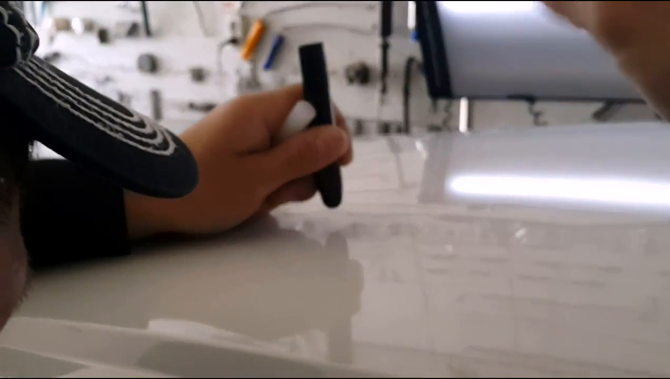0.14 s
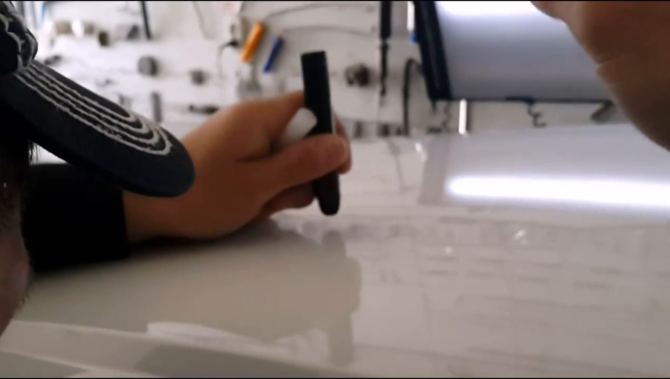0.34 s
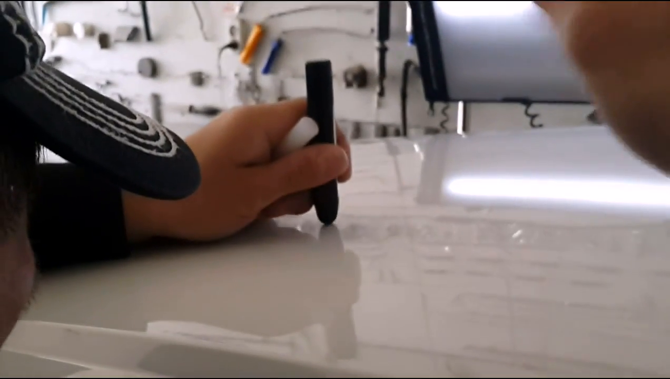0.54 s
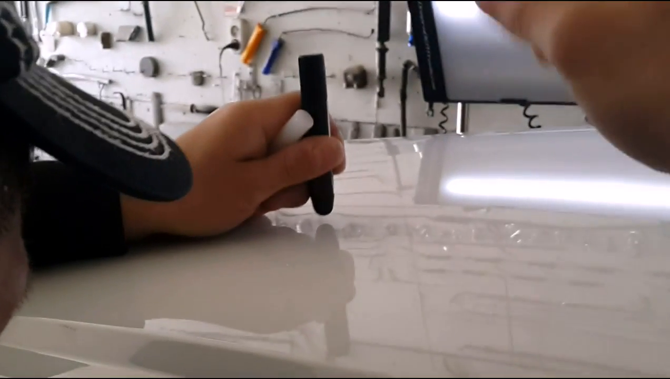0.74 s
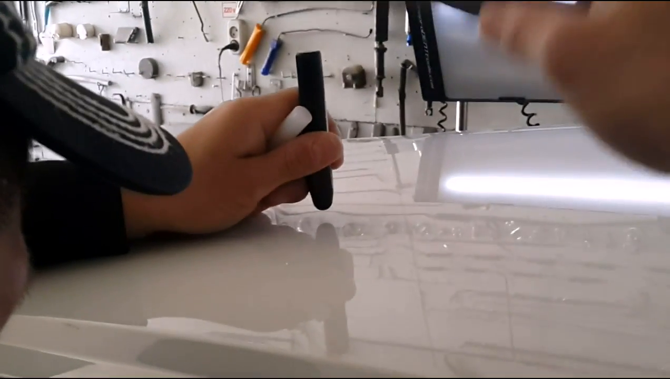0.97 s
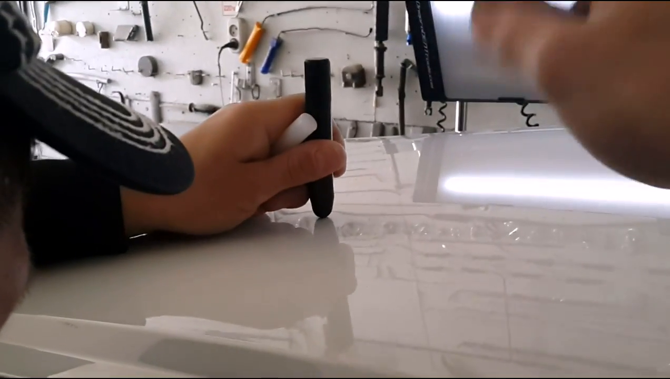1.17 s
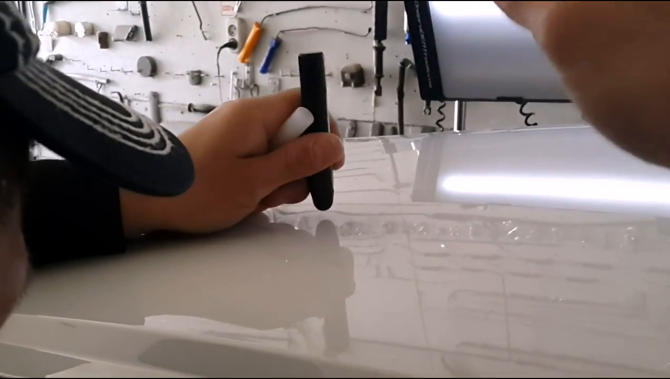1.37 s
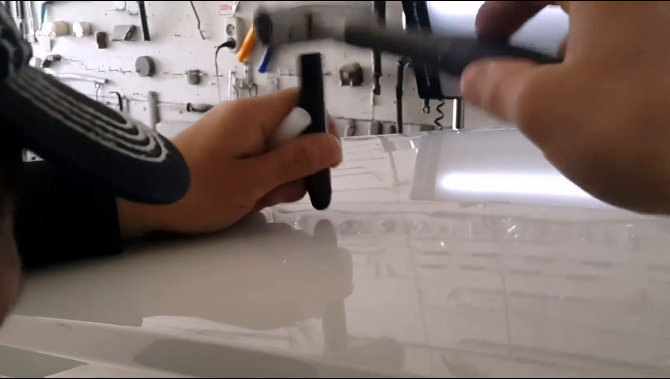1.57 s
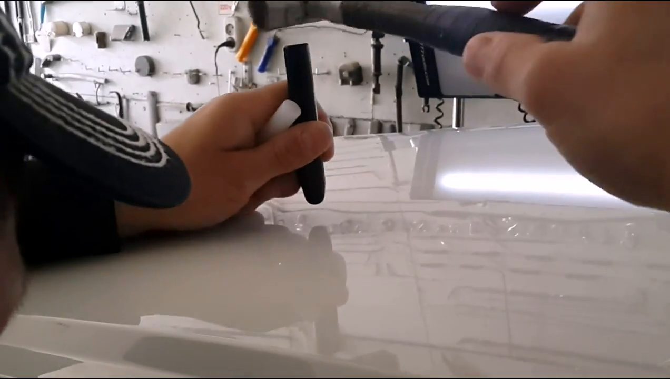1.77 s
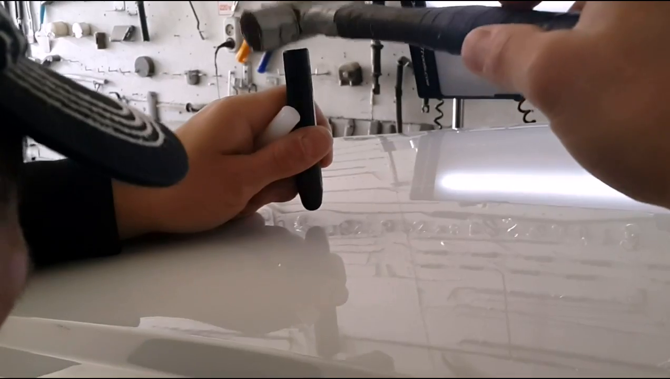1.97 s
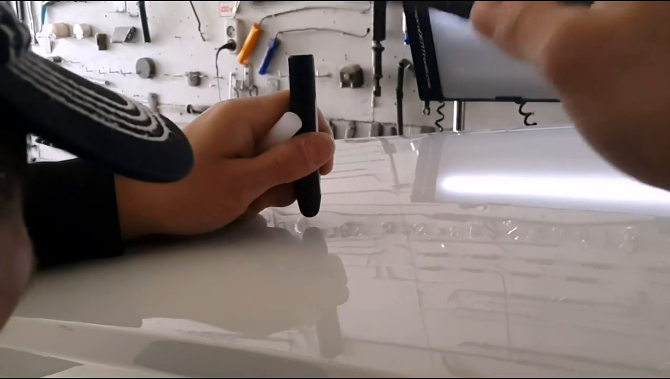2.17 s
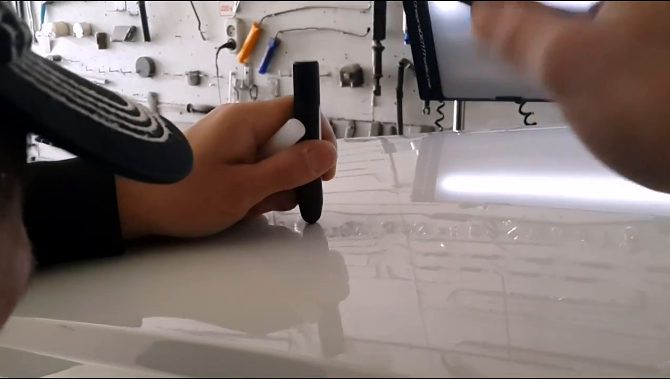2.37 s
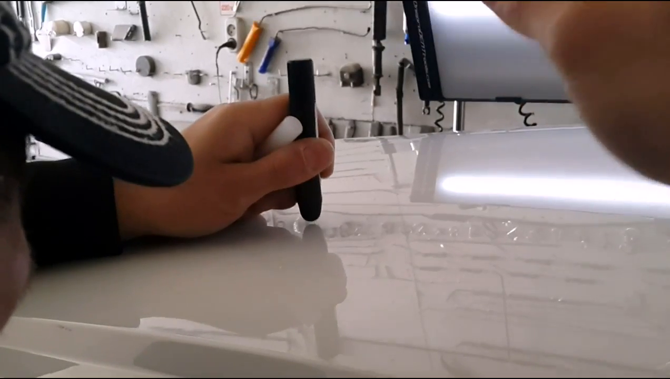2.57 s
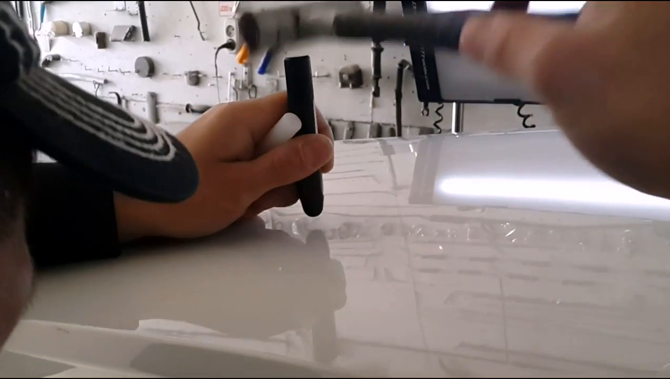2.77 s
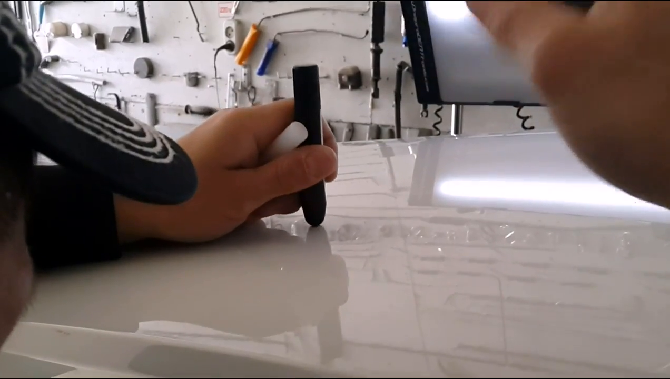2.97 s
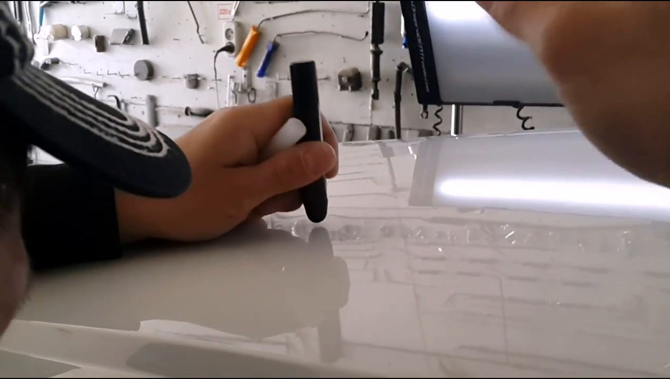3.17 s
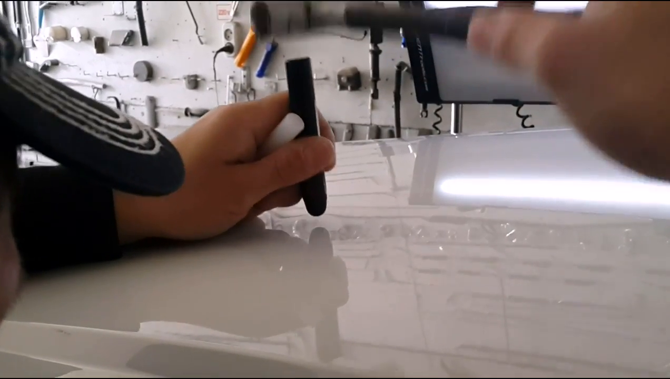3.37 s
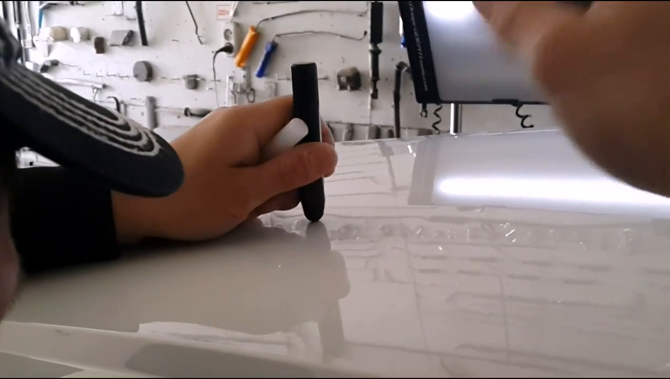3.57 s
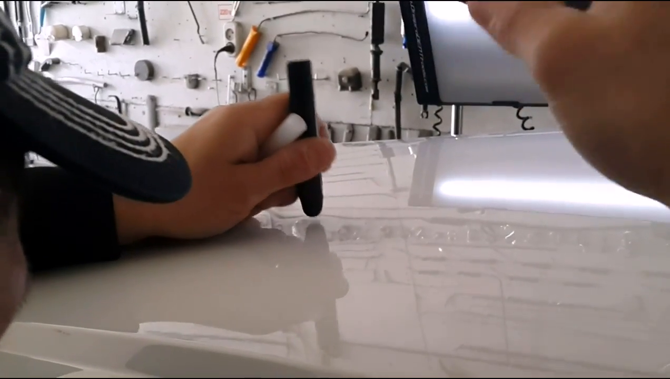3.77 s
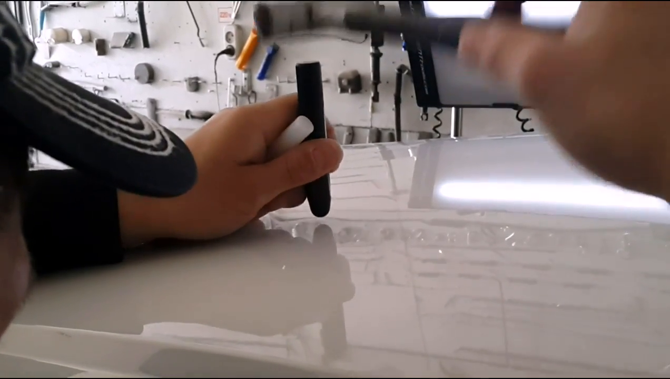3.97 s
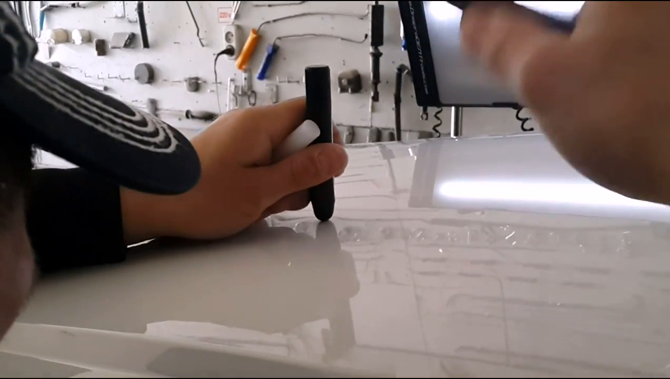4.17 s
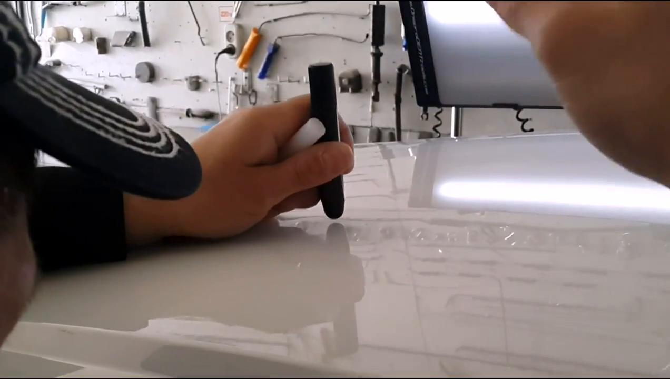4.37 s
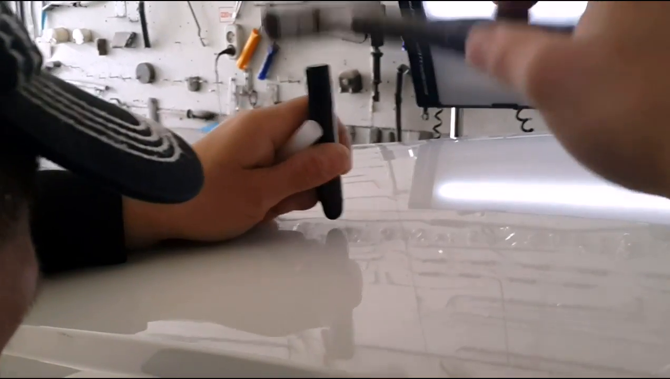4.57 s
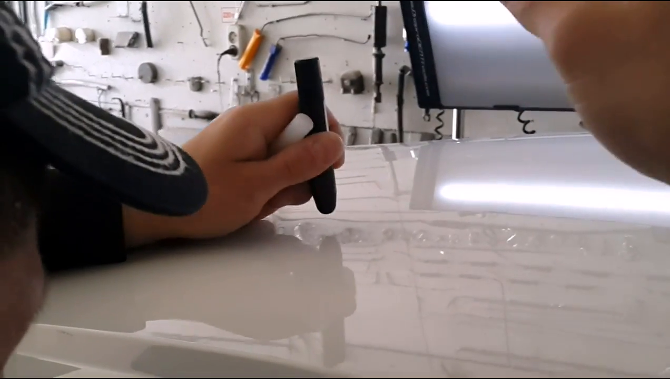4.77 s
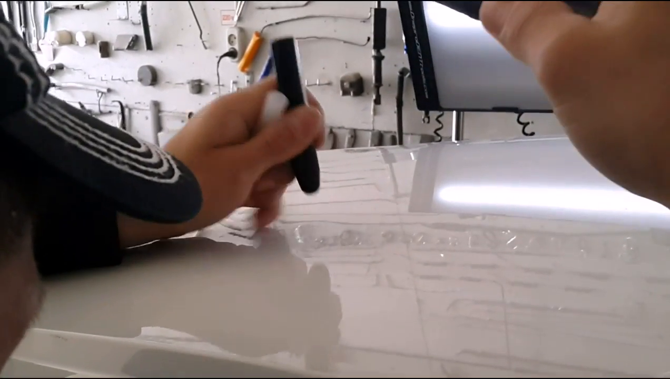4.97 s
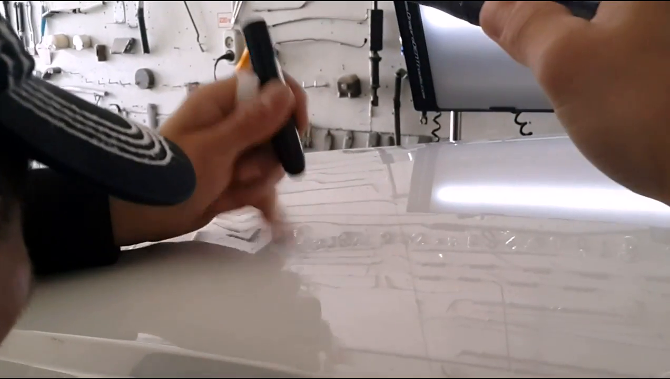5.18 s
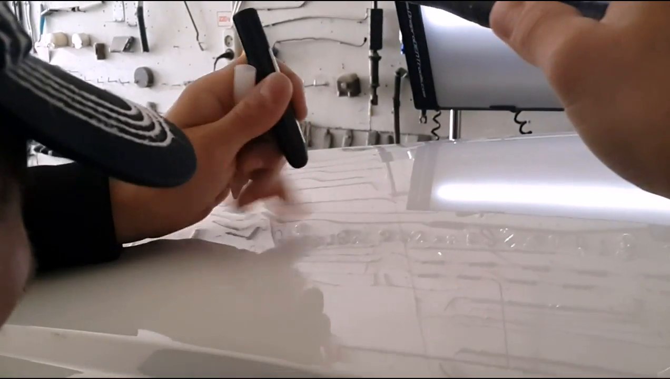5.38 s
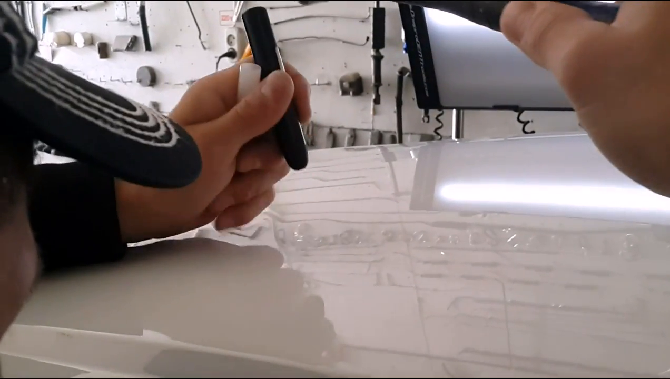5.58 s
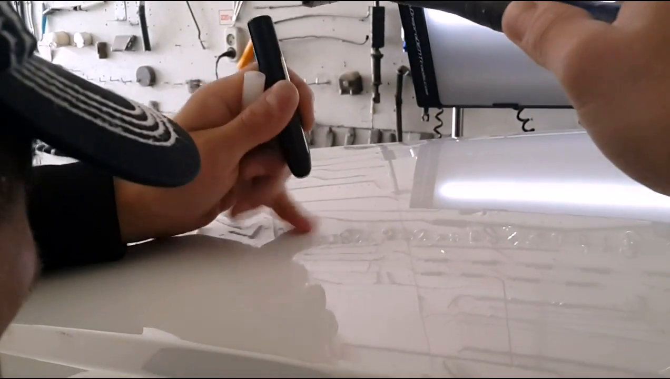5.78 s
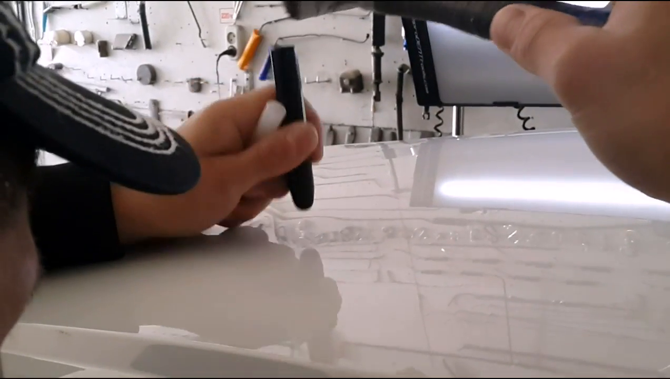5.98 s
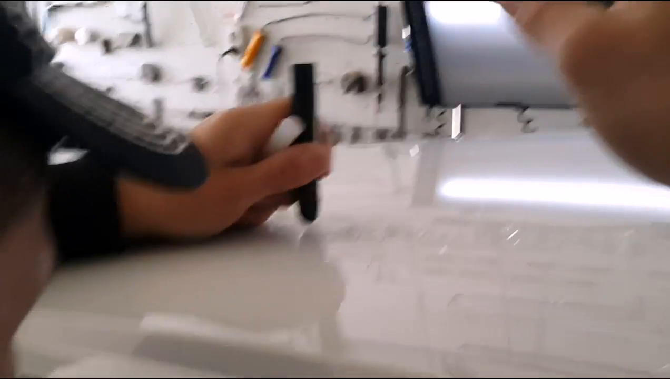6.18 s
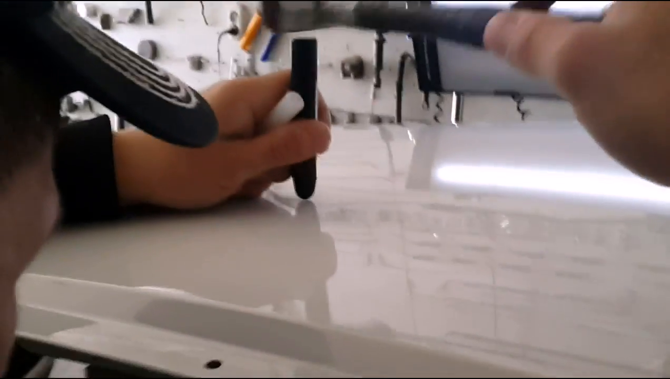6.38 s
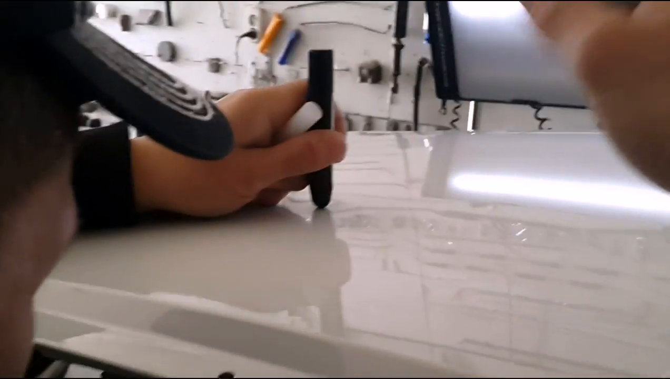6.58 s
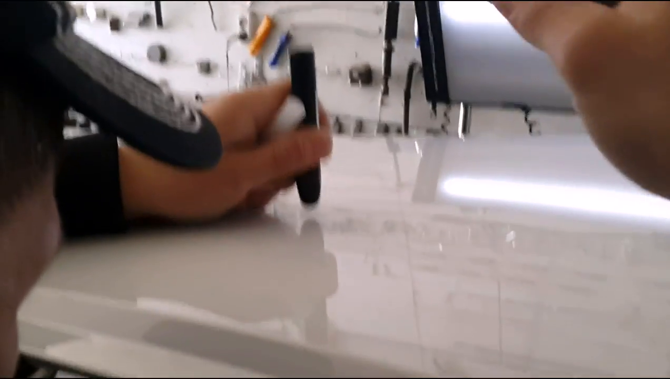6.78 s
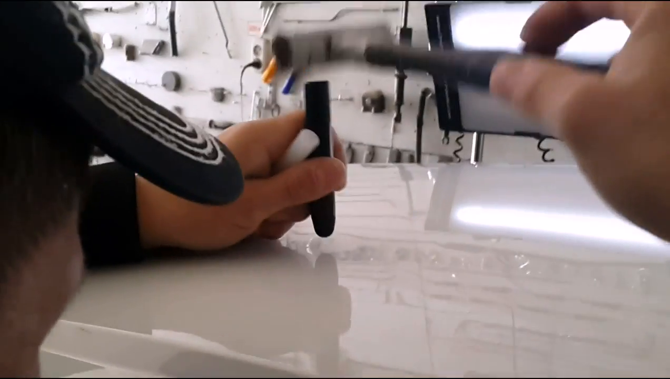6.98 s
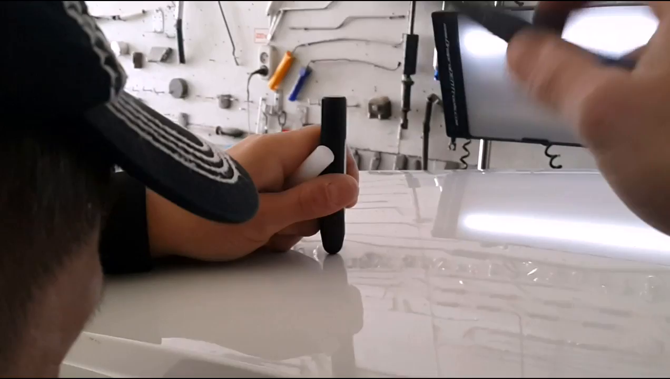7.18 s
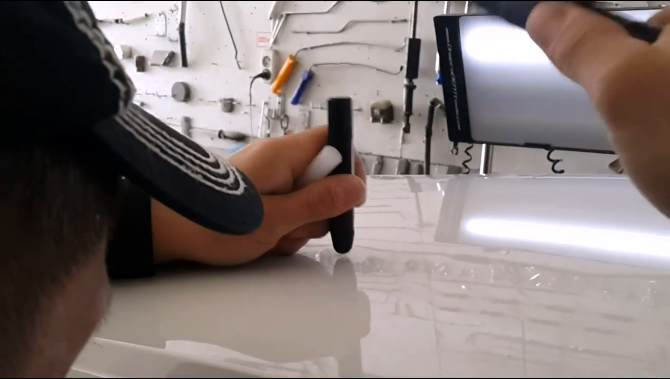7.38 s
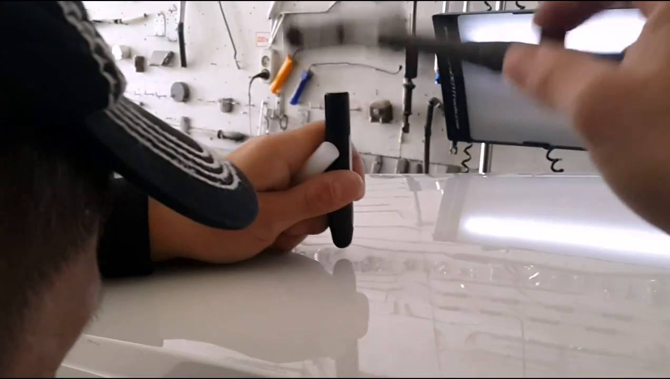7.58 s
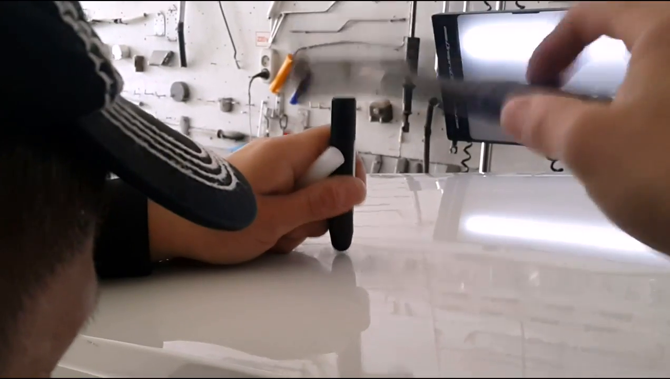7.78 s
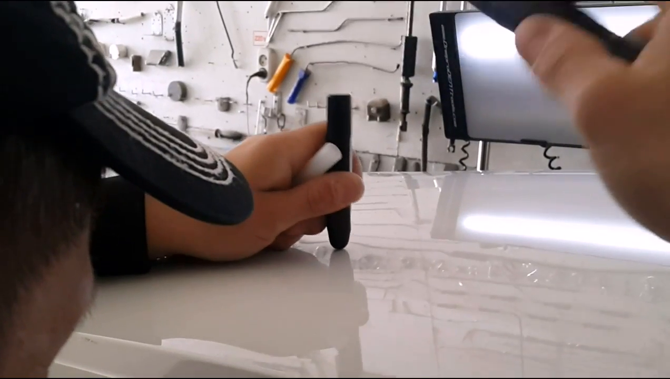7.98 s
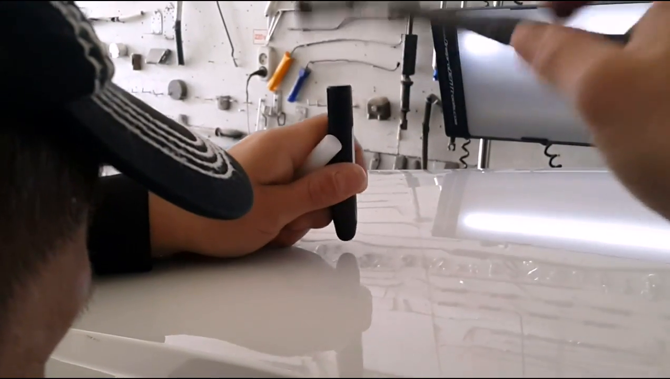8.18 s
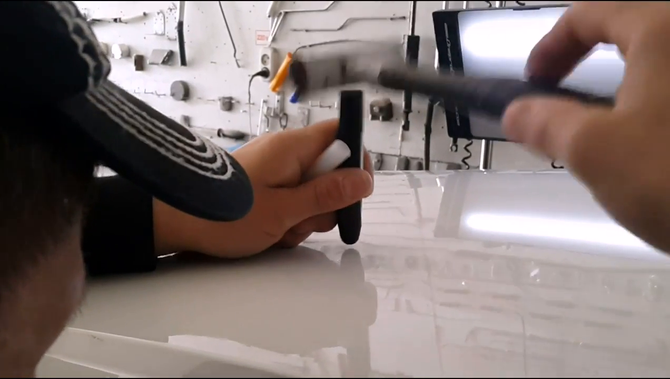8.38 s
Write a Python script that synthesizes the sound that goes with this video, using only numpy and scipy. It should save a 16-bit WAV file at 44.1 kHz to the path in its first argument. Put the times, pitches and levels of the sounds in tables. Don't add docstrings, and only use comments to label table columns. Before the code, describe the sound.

In a bare hard-walled workshop, rapid metal taps hit a body panel through a steel punch, loud and slightly squashed by a camera microphone. The panel rings dull and clanky for under half a second, overlapping into the next blow. Tiny ticks of the punch being reset precede many hits. Midway, tapping stops; soft fingertip knocks and swelling lamp and fan hum appear before the strongest hit restarts the run.

```python
import sys
import numpy as np
from scipy import signal
from scipy.fft import rfft, irfft
from scipy.io import wavfile
from scipy.ndimage import uniform_filter1d, map_coordinates

SR = 44100
rng = np.random.default_rng(int(sys.argv[2]) if len(sys.argv) > 2 else 0)


def boost(x):
    u = np.asarray(x, float) / 20
    return 10 ** u


def transcribe(u):
    v = np.clip(np.atleast_2d(u).T, -1, 1)
    q = np.round(v * 32767).astype(np.int16)
    wavfile.write(sys.argv[1], SR, q)


N = 372204

RING = 24576
TYPICAL_MIDDLE_DB, TYPICAL_TREBLE_DB = -10, -23


def unit(x):
    return x / np.sqrt(np.mean(x ** 2) + 1e-20)


def along(points, hz):
    f, v = np.transpose(points)
    return np.interp(np.log(hz + 1), np.log(f + 1), v)


# frequency in Hz, left over right in dB.
STEREO_LEAN = [(60, 1), (110, 0), (200, 2), (380, -0.5), (700, 0.5), (1290, -4.5), (2380, -3), (4400, 4),
               (8120, -4.5), (15000, 0)]


def spread(pair, spectrum, alike):
    hz = np.fft.rfftfreq(pair.shape[-1], 1 / SR)
    turn = np.arccos(np.clip(along(alike, hz), -1, 1)) / 2
    mid, side = rfft(pair) * boost(along(spectrum, hz)) * [np.cos(turn), np.sin(turn)]
    lean = boost(along(STEREO_LEAN, hz) / 2)
    return unit(irfft(np.array([(mid + side) * lean, (mid - side) / lean]), pair.shape[-1]))


def causal(x, gain):
    cepstrum = irfft(np.log(gain + 1e-6), x.shape[-1])
    cepstrum[1:len(cepstrum) // 2] *= 2
    cepstrum[len(cepstrum) // 2 + 1:] = 0
    return irfft(rfft(x) * np.exp(rfft(cepstrum)), x.shape[-1])


# start in seconds, body peak in dB,
# treble over body in dB, boom in dB, shine of the punch at 8 kHz in dB.
BLOWS = [(-.17, -17.5, -17, 1, 0), (0.096, -11, -16, -1, 0), (0.795, -9, -15.5, -0.5, 1.5),
         (1.066, -8, -16.5, -1.5, 1), (1.384, -6.5, -18.5, -1.5, 0.5), (1.721, -8, -15.5, -1, -1),
         (2.585, -9, -15.5, 1.5, 1.5), (2.858, -6.5, -28.5, 0.2, 6), (3.218, -7, -23.5, -0.5, 6),
         (3.481, -6.5, -24.5, -1.5, 3.5), (3.811, -8.5, -15.5, -1, 2), (4.078, -8, -17.5, -1, -2.5),
         (4.391, -8.5, -20, 0.1, .7), (4.7, -9, -25.5, -1, 3.5), (6.514, -2.5, -30, 0, 2.5),
         (6.812, -6.5, -15.5, -1.5, -0.5), (7.103, -10, -15, 0, 1.5), (7.393, -11, -14.5, 0, -0.5),
         (7.694, -11.5, -17, 0.5, -1.5), (7.978, -9, -26.5, -1.5, 3), (8.275, -9, -15, -1, -1)]


def hammer_blows():
    square_treble_db, crack_over_body_db, crack_loss = -15, 3.5, 0.34
    rows = []
    for start, body_db, treble_db, boom_db, shine_db in BLOWS:
        glance = square_treble_db - treble_db
        middle_db = TYPICAL_MIDDLE_DB + 0.2 * (treble_db - TYPICAL_TREBLE_DB)
        crack_db = body_db + crack_over_body_db - crack_loss * glance ** 2
        row = (start, body_db, middle_db, treble_db, crack_db, 1.016)
        clank_db = .3 * boom_db
        rows.append((row, (boom_db, clank_db, shine_db)))
    return rows


def since_blow(lead):
    t, onsets = np.arange(N) / SR, np.array(BLOWS)[:, 0]
    return t - onsets[np.searchsorted(onsets - lead, t) - 1]


# start in seconds, body peak in dB, treble over body in dB.
PUNCH_SETS = [(.021, -43, -21), (.720, -43.5, -22.5), (1.305, -39.5, -19.5), (1.628, -35.5, -17),
              (2.179, -63, -24.5), (2.509, -45, -20), (2.803, -44.5, -11.5), (3.147, -41, -24),
              (3.733, -40.5, -16.5), (6.443, -35.5, -19), (6.722, -28.5, -22), (7.022, -50, -20),
              (7.291, -37.5, -12), (7.899, -42, -19), (8.183, -44, -15)]


def punch_sets():
    return [(start, body_db, -5 + .3 * (treble_db + 19.5), treble_db, body_db - 8, 2.1)
            for start, body_db, treble_db in PUNCH_SETS]


# start in seconds, crack in dB.
GRAZES = [
    (4.376, -46.5),
    (6.4645, -27),
]


def hammer_grazes():
    return [(start, crack_db - 28.5, -1, -13.5, crack_db, .93) for start, crack_db in GRAZES]


# start in seconds, body peak in dB, middle over body in dB.
FINGERS = [
    (5.639, -57.5, -42),
    (5.685, -59.5, -40),
    (5.774, -66, -40),
    (5.92, -53.5, -34),
    (5.952, -42, -14),
    (5.975, -44.5, -16),
    (6.055, -51, -7),
]


def finger_touches():
    return [(start, body_db, middle_db, middle_db - 15.5, body_db - 25.5, 1.6)
            for start, body_db, middle_db in FINGERS]


def contacts():
    rows = hammer_blows()
    for row in punch_sets() + finger_touches() + hammer_grazes():
        middle_over_typical = row[2] - TYPICAL_MIDDLE_DB
        rows.append((row, (-.3 * middle_over_typical, .5 * middle_over_typical, 0)))
    return rows


def punch_crack(crack_db):
    size = 1024
    t, f = np.arange(size) / SR, np.fft.rfftfreq(size, 1 / SR)
    snap = .6 * rng.standard_normal(size) - np.sin(2 * np.pi * 7000 * t)
    snap = snap * boost(-60 * t / .0025)
    snap[0] -= 1.5
    colour = [(800, -14.5), (3000, -10.5), (7000, -0.5), (12000, -0.5), (15400, -11), (16800, -24.0)]
    snap = causal(snap, boost(along(colour, f)))
    return boost(crack_db) * np.array([boost(-8.5) * np.roll(snap, shift=18), boost(4.5) * snap])


PANEL_HZ = [70, 82, 123, 150, 206, 219, 250, 265, 290, 330, 356, 376, 415, 440, 470, 508, 530, 556, 580,
            619, 647, 685, 720, 750, 888, 961, 1057, 1178, 1284, 1418]
# level in dB, t60 in seconds.
PANEL_RING = [(-17, 0.44), (-22, 0.29), (-6.5, 0.48), (-4, 0.27), (0, 0.41), (0.5, 0.36), (-3.5, 0.3),
              (-3.5, 0.27), (-0.5, 0.043), (-1, 0.51), (-2, 0.58), (-7.5, 0.72), (-11, 0.84), (-17, 0.34),
              (-9.5, 0.62), (-3.5, 0.39), (-6, 0.2), (-3, .4), (-7.5, 0.21), (-8.5, 0.45), (-4, 0.43),
              (-3.5, 0.37), (-9.5, 0.5), (-10, 0.31), (-11.5, 0.2), (-8, 0.36), (-1.5, 0.3), (-8.5, 0.14),
              (-11.5, 0.42), (0.5, 0.089)]


def panel_modes():
    t = np.arange(RING) / SR
    hz = np.array(PANEL_HZ)[:, None]
    db, t60 = np.transpose(PANEL_RING)[:, :, None]
    t60 = np.minimum(t60, .52)
    knots = rng.standard_normal((2, len(PANEL_RING), 24))
    swing, bend = [np.array([map_coordinates(k, [t * 28]) for k in group]) for group in knots]
    phase = rng.uniform(0, 2 * np.pi, hz.shape) + .35 * bend
    skew = rng.normal(0, 1, hz.shape) * (0.44 + hz / 1500)
    rise = 1 - np.exp(-t * hz / .9)
    ports = []
    for side, lean_db in ((-.5, -1.1), (.5, 0.1)):
        level = rise * boost(db + lean_db + 3.4 * swing - 60 * t / t60)
        ports.append(level * np.sin(2 * np.pi * hz * t + phase + side * skew))
    return np.array(ports)


# frequency in Hz, level in dB per Hz.
BODY_SPECTRUM = [(40, -54), (100, -22), (200, -16), (400, -11.5), (700, -9), (1060, -8.5), (1700, -13.5),
                 (2200, -14.5), (3500, -21), (5500, -29), (7500, -33.5), (11000, -38), (14500, -43.5),
                 (15600, -63.5)]
# frequency in Hz, left-right likeness.
BODY_ALIKE = [(60, 0), (150, 0.89), (380, 1), (950, 0), (2380, 0.035), (5980, 0.0), (15000, 0.14)]


def body_noise():
    return spread(rng.standard_normal((2, RING)), BODY_SPECTRUM, BODY_ALIKE)


# frequency in Hz, t60 in seconds.
DENSE_DECAY = [(60, 0.21), (200, 0.92), (600, .45), (2000, 0.42), (6000, 0.4), (14000, 0.31)]


def dense_ring(noise, damping):
    hz, frame_s, z = signal.stft(noise, SR, nperseg=256)
    clumps = uniform_filter1d(rng.standard_normal(z.shape[1:]), size=2, axis=0)
    clumps = unit(uniform_filter1d(clumps, size=7, axis=1))
    fade_db = -60 * damping * frame_s / along(DENSE_DECAY, hz)[:, None]
    return signal.istft(z * boost(1.3 * clumps + fade_db), SR, nperseg=256)[1][:, :RING]


def push(t, width):
    u = np.maximum(t, 0) / width
    return -u * (2 - u) * np.exp(-u)


# delay in seconds, level in dB.
WALL_ECHOES = [(0, -2), (.0095, -8), (.0275, -8), (.038, -9), (.0522, 2), (.066, -10), (.086, -11)]


def wall_pushes(t):
    return boost(9) * sum(boost(db) * push(t - s, width=.0003 + .006 * s) for s, db in WALL_ECHOES)


# time after the blow in seconds, gain in dB.
LIMITER_SWELL = [(0, 3.5), (.02, 1.5), (.06, 3.5), (.1, 4.5), (.16, 2), (.25, 3), (.4, -3.5)]


def strike(row, spot, fixed, modes):
    _, body_db, middle_db, treble_db, crack_db, damping = row
    boom_db, clank_db, shine_db = spot
    t, f = np.arange(RING) / SR, np.fft.rfftfreq(RING, 1 / SR)
    same = 0.48
    noise = np.sqrt(same) * fixed + np.sqrt(1 - same) * body_noise()
    dense = dense_ring(noise, damping)
    tones = boost(rng.normal(0, 2.0, len(PANEL_RING))) @ modes * boost(-140 * (damping - 1) * t)
    ring = (boost(-3) * dense + boost(-8) * tones) * (1 - np.exp(-t / .0005))
    ring = ring * boost(np.interp(t, *np.transpose(LIMITER_SWELL))) + wall_pushes(t)
    brighter_db = treble_db - TYPICAL_TREBLE_DB
    hardness = [(70, min(boom_db, 0) - 4), (130, boom_db), (220, boom_db), (600, 0.0014), (1300, clank_db),
                (2800, middle_db - TYPICAL_MIDDLE_DB), (6500, brighter_db), (14000, 1.3 * brighter_db)]
    shine = shine_db * np.exp(-((f - 7900) / 700) ** 2)
    ring = boost(body_db - 6.5) * causal(ring, boost(along(hardness, f) + shine))
    ring[:, :1024] += punch_crack(crack_db)
    return ring


def taps():
    out = np.zeros((2, N + RING))
    fixed, modes = body_noise(), panel_modes()
    for row, spot in contacts():
        start = round(row[0] * SR)
        sound = strike(row, spot, fixed, modes)[:, max(0, -start):]
        out[:, max(0, start):][:, :sound.shape[1]] += sound
    return signal.sosfilt(signal.butter(2, 60, "high", fs=SR, output="sos"), out[:, :N])


def lamp_whine():
    t, jumps_s, jump_hz, slide_s = np.arange(N) / SR, (4.985, 5.38), 200, .06
    slides = sum((t > s) * np.exp(-np.abs(t - s) / slide_s) for s in jumps_s)
    sag_hz = 40 * np.maximum(t - jumps_s[0], 0)
    turns = 2 * np.pi * np.cumsum(6030 + jump_hz * slides - sag_hz) / SR
    return boost(-89.5) * np.sin(turns) + boost(-104) * np.sin(2 * turns)


# frequency in Hz, level in dB rms, wander of the phase.
HUM_LINES = [(121, -84, .008), (619, -86, .01), (689, -87, .01), (840, -78, .003), (1028, -88, .01),
             (1680, -84, .008)]


def hum():
    t, lines = np.arange(N) / SR, 0
    for hz, db, wander in HUM_LINES:
        drift = uniform_filter1d(rng.standard_normal(N), size=2000).cumsum()
        phase = 2 * np.pi * hz * t + wander * drift + [[0], [.8]]
        lines = lines + np.sqrt(2) * boost(db) * np.sin(phase)
    return lines


# frequency in Hz, level in dB per Hz.
ROOM_SPECTRUM = [(15, -17.5), (32, -21.5), (55, -36), (110, -15), (214, -9), (273, -18), (600, -3),
                 (840, -6.5), (950, -12), (1690, -10), (3700, -20.5), (10000, -31), (15450, -27),
                 (15600, -73)]
# frequency in Hz, left-right likeness.
ROOM_ALIKE = [(60, .6), (200, 0.58), (640, -0.36), (1400, 0.074), (4000, -0.15)]


def workshop():
    air = boost(-68) * spread(rng.standard_normal((2, N)), ROOM_SPECTRUM, ROOM_ALIKE)
    hold_s, recover_s, recover_db = 0.89, 0.22, 12.5
    opened = 1 - np.exp(-np.maximum(since_blow(0) - hold_s, 0) / recover_s)
    return boost([[-.6], [.6]]) * (air + hum() + lamp_whine()) * boost(recover_db * opened)


def scene():
    return taps() + workshop()


TOP_HZ = 15550
# frequency in Hz, share.
SPARSE_TREBLE = [(4000, 0), (7000, .55), (10000, .88), (13000, 1.15), (14500, 1.4), (15100, 4)]


def thinned(x):
    hz, _, z = signal.stft(x, SR, nperseg=2048, noverlap=1536)
    power = uniform_filter1d(np.sum(np.abs(z) ** 2, axis=0), size=5, axis=1)
    power = uniform_filter1d(power, size=5, axis=0)
    weak = power < along(SPARSE_TREBLE, hz)[:, None] * uniform_filter1d(power, size=31, axis=0)
    dropped = z * (weak | (hz[:, None] > TOP_HZ))
    lost = signal.istft(dropped, SR, nperseg=2048, noverlap=1536)[1][:, :N]
    x = x - np.interp(since_blow(.024), [.008, .022, .3, .38], [0, 1, 1, 0]) * lost
    t, onsets = np.arange(N) / SR, np.array(BLOWS)[:, 0]
    early = (onsets * SR - 312) % 1024 < 600
    mute_lead_s, mute_s = .011, .0055
    for s in onsets[early] - mute_lead_s:
        x = x * (1 - np.interp(t, [s - .002, s, s + mute_s, s + mute_s + .0015], [0, .99, .99, 0]))
    return x


def top_cut(x):
    return signal.sosfilt(signal.butter(12, 16820, fs=SR, output="sos"), x)


def record(dry):
    held = dry / (1 + np.abs(dry / .98) ** 6) ** (1 / 6)
    edge_db = along([(TOP_HZ, 0), (TOP_HZ + 200, -18), (16800, -26)], np.fft.rfftfreq(N, 1 / SR))
    finished = thinned(irfft(rfft(held) * boost(edge_db), N))
    return top_cut(finished)


dry = scene()
out = record(dry)
transcribe(out)
```